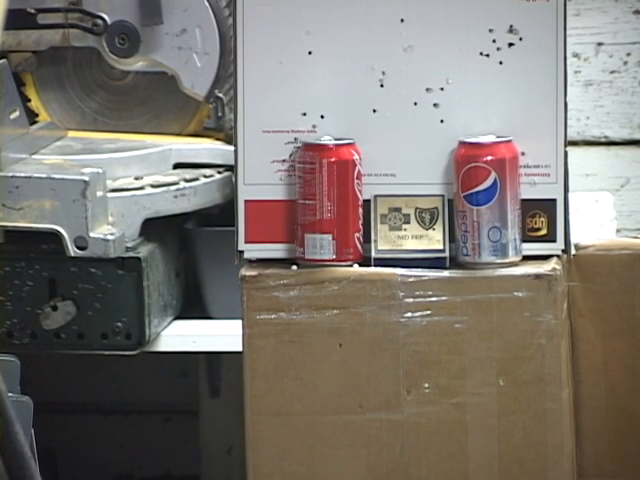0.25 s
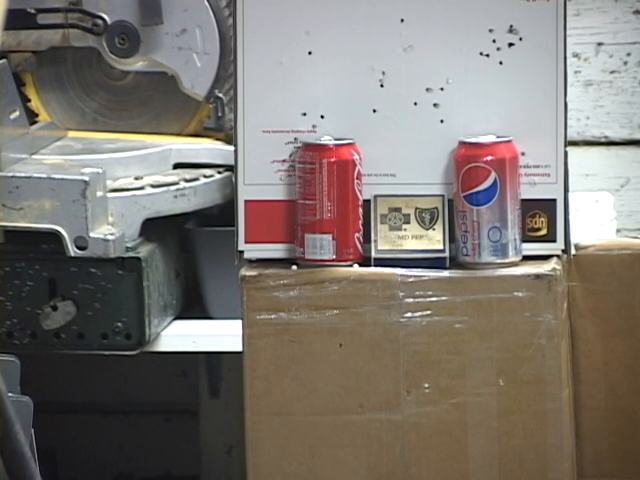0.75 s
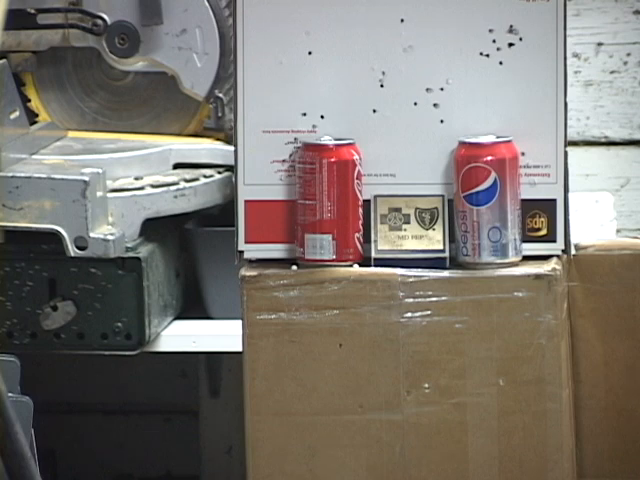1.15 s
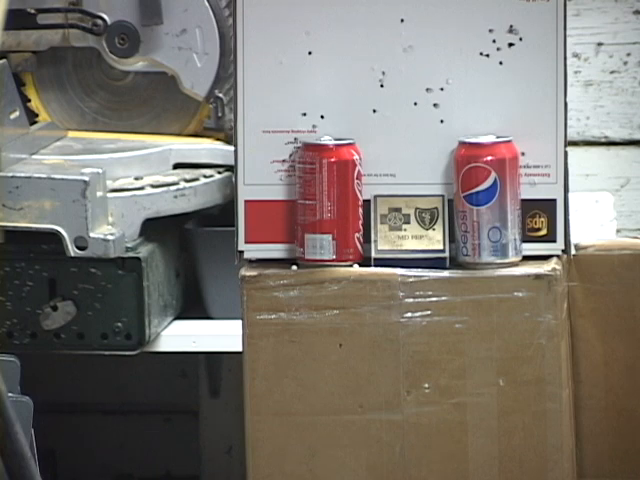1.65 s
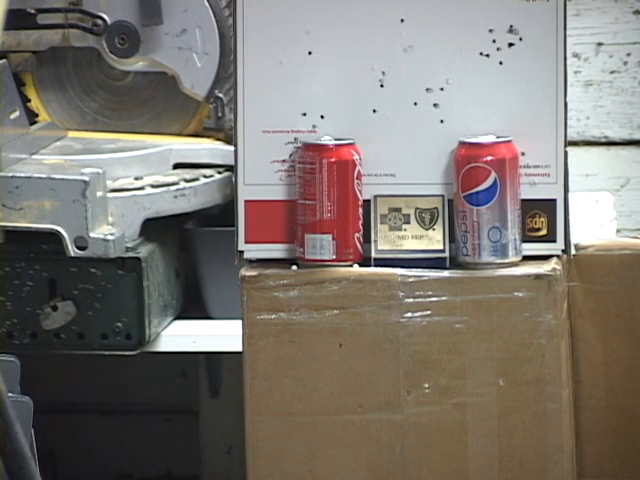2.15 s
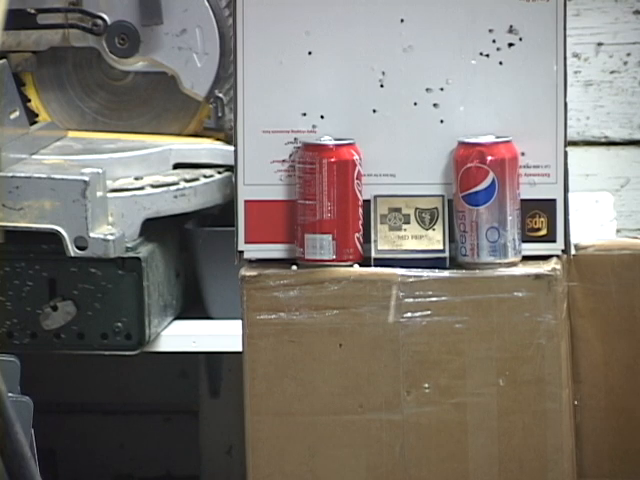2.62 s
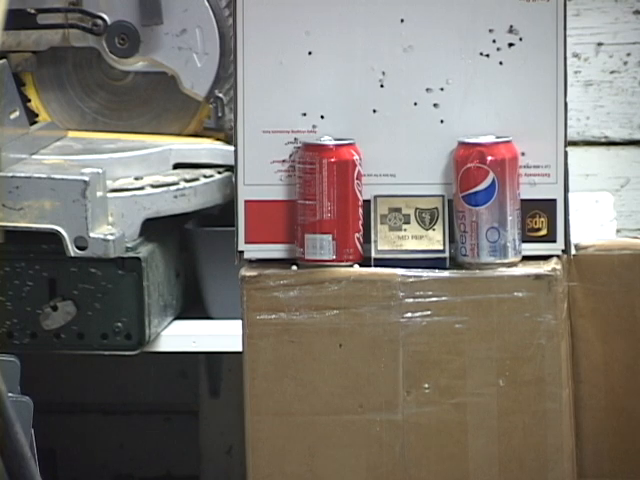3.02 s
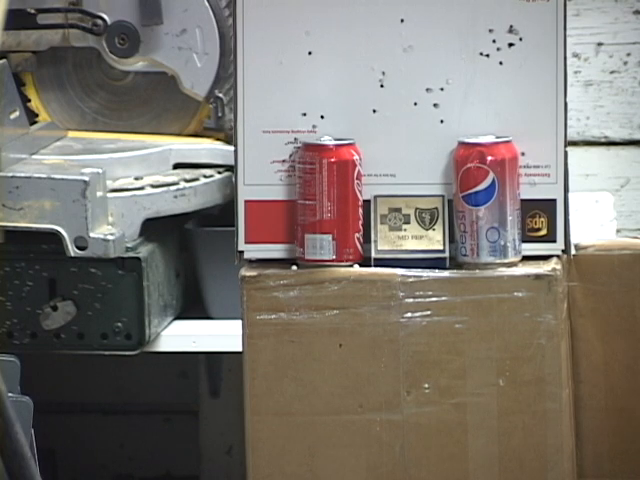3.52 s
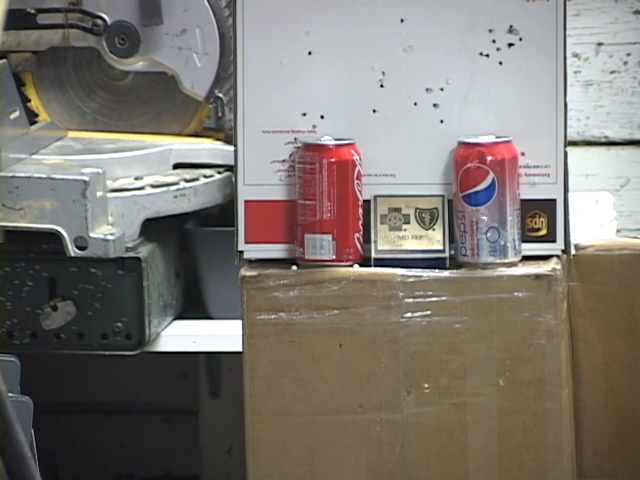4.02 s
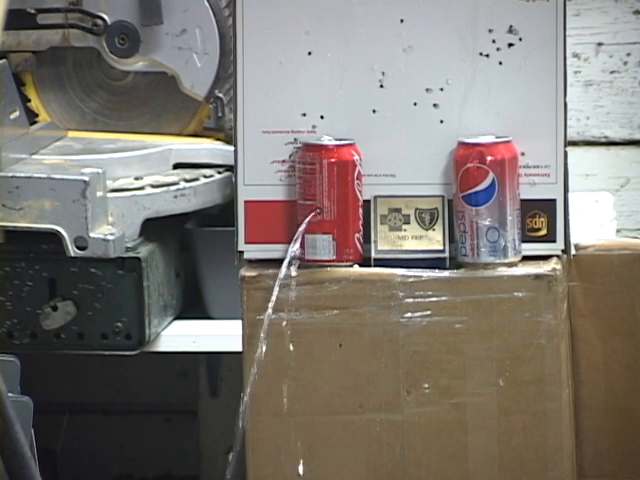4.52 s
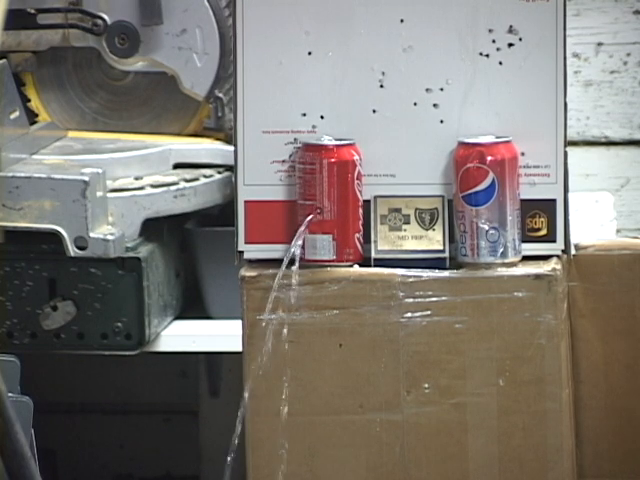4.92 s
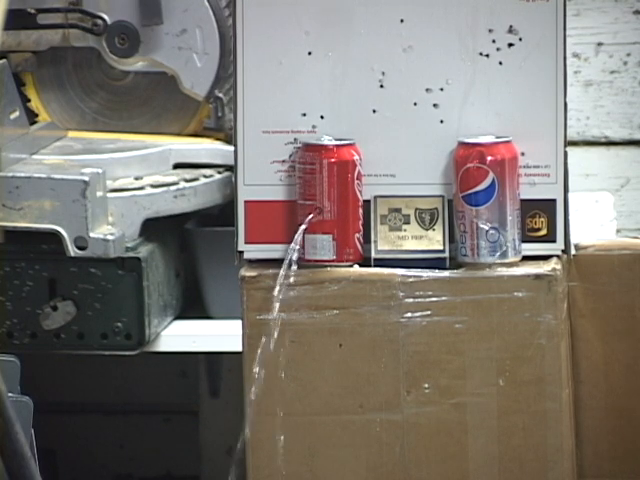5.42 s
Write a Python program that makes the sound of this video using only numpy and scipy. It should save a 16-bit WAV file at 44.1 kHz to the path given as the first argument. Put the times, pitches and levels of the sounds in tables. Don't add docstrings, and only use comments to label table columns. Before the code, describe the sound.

Quiet garage hiss, low rumble and a faint cricket, with slight cloth rustle and hand contacts. A spring air gun then slams very close, its pellet cracking onto the target, with a hollow barrel ring and metallic room echo. The plastic slide scrapes and clacks back and forth, a second shot pierces a can, liquid hisses and spatters, and pumping begins again. Stereo microphone, overloaded and flattened by automatic gain.

```python
import sys
import numpy as np
from scipy import signal
from scipy.fft import rfft, irfft
from scipy.io import wavfile
from scipy.ndimage import uniform_filter1d

SR = 44100
rng = np.random.default_rng(int(sys.argv[2]) if len(sys.argv) > 2 else 0)


def rack_gain(trim_db):
    fader = np.asarray(trim_db, float)
    return 10 ** (fader / 20)


def file_out(sig):
    cols = np.atleast_2d(sig).T
    lim = np.clip(cols, -1, 1)
    pcm = np.round(lim * 32767).astype(np.int16)
    wavfile.write(sys.argv[1], SR, pcm)


N = 249606
T = np.arange(N) / SR

# frequency [Hz], t60 [s].
GARAGE_T60 = [(100, 0.099), (300, 0.21), (700, 0.26), (1400, 0.26), (2500, 0.24), (6000, 0.23),
              (12000, 0.19)]
# frequency [Hz], likeness [0-1].
ECHO_ALIKE = [(60, .85), (400, .87), (800, .75), (1500, .45), (2500, .25), (4000, .08), (15000, .05)]


def unit(x):
    return x / np.sqrt(np.mean(x ** 2) + 1e-20)


def along(points, hz):
    f, v = np.transpose(points)
    return np.interp(np.log(hz + 1), np.log(f + 1), v)


def add(mix, start_s, sound):
    part = mix[:, round(start_s * SR):][:, :sound.shape[1]]
    part += sound[:, :part.shape[1]]


def diffuse(size, gain, alike):
    hz, t, z = signal.stft(rng.standard_normal((2, size)), SR, nperseg=256)
    turn = np.arccos(np.clip(along(alike, hz), -1, 1))[:, None] / 2
    mid, side = z[0] * np.cos(turn), z[1] * np.sin(turn)
    shaped = np.array([mid + side, mid - side]) * gain(hz[:, None], t)
    return signal.istft(shaped, SR, nperseg=256)[1][:, :size]


def causal(x, colour_db):
    cepstrum = irfft(np.log(rack_gain(colour_db(np.fft.rfftfreq(1024, 1 / SR))) + 1e-6))
    cepstrum[1:512] *= 2
    cepstrum[513:] = 0
    impulse = irfft(np.exp(rfft(cepstrum)))[None, :512]
    return signal.fftconvolve(x, impulse, axes=1)[:, :x.shape[1]]


def strike(colour_db, pan_db, echo_db, build_s, last_s=.5, stretch=1):
    crack_t60_s, right_lag_samples = .011, 6
    size = int(last_s * SR)
    t = np.arange(size) / SR
    crack = rng.standard_normal(size) + 0.79 * rng.standard_normal((2, size))
    crack *= rack_gain(-60 * t / crack_t60_s)
    reflections = uniform_filter1d(rng.standard_normal(size), size=25)
    grain = rack_gain(3.34 * np.exp(-t / 0.15) * 4.2 * reflections)
    tail = diffuse(size, lambda hz, u: rack_gain(-60 * u / along(GARAGE_T60, hz) / stretch), ECHO_ALIKE)
    tail = tail * grain * (1 - np.exp(-t / build_s))
    panned = crack * rack_gain([[pan_db / 2], [-pan_db / 2]])
    sound = causal(panned + rack_gain(echo_db - 19.0) * tail, colour_db)
    sound[1] = np.pad(sound[1], (right_lag_samples, 0))[:size]
    return sound / np.abs(sound[:, :SR // 50]).max()


def rings(modes, wander, rise_s, last_s=0.97):
    t = T[:int(last_s * SR)]
    ring = np.zeros((2, len(t)))
    for hz, db, t60_s in modes:
        level = rack_gain(db + rng.normal(0, 2) - 60 * t / t60_s)
        drift = wander * np.cumsum(rng.standard_normal(len(t))) + rng.normal(0, 0.4, (2, 1))
        ring += level * np.sin(2 * np.pi * hz * t + drift)
    return ring * (1 - np.exp(-t / rise_s)) * (1 - (t / last_s) ** 2)


def rafters():
    # frequency [Hz], level [dB], t60 [s].
    late = [(150, 0, 0.33), (500, -1.5, 1), (1300, -1.5, 0.86), (2600, -6, 0.85), (6000, -15, 0.32),
            (11970, -24.5, .4)]
    hz0, db, t60_s = np.transpose(late)
    fade = lambda hz, t: rack_gain(along(np.c_[hz0, db], hz) - 60 * t / along(np.c_[hz0, t60_s], hz))
    tail = diffuse(SR // 2, fade, ECHO_ALIKE) * (1 - np.exp(-T[:SR // 2] / 0.049))
    return tail / np.abs(tail).max()


def gun_colour(body_db, edge_db):
    # frequency [Hz], level [dB].
    plastic = [(100, -17.5), (400, -4), (1200, -1), (3000, -2.5), (5500, 0), (9000, -5.5), (12000, -17.5),
               (16000, -36.5)]
    tilt = [(1000, body_db + 9.5), (2000, 0), (8000, 0.0076), (12000, edge_db + 16.5)]
    return lambda hz: along(plastic, hz) + along(tilt, hz)


def air():
    # frequency [Hz], density [dB per Hz].
    air_spectrum = [(59, -20.5), (100, -5), (177, -8), (233, -11), (380, -11), (700, -20), (2420, -29),
                    (15500, -33)]
    # frequency [Hz], left-right likeness [0-1].
    air_alike = [(60, .9), (150, .7), (300, .3), (1400, .3), (3000, 0)]
    # time [s], level [dB].
    rumble_level = [(0.0, -51.5), (0.31, -54), (1.26, -53.5), (2.9, -51.5), (3.04, -50), (3.48, -60),
                    (3.61, -51.5), (5.56, -52), (5.66, -44)]
    # time [s], level [dB].
    rustle_level = [(0, -71), (.3, -60), (.45, -78), (.6, -64), (.7, -99)]
    machine = lambda hz: rack_gain(4.5 * np.exp(-((hz - 1300) / 220) ** 4))
    hiss = diffuse(N, lambda hz, t: rack_gain(along(air_spectrum, hz)) * machine(hz), air_alike)
    still = rack_gain(-56.5) * unit(hiss)
    low = signal.butter(2, [38, 95], "band", fs=SR, output="sos")
    rumble = unit(signal.sosfilt(low, rng.standard_normal(N) + 0.17 * rng.standard_normal((2, N))))
    cloth = unit(diffuse(SR, lambda hz, t: rack_gain(-5 * np.log2((hz + 1) / 2500) ** 2), ECHO_ALIKE))
    add(still, 0, rack_gain(np.interp(T[:SR], *np.transpose(rustle_level))) * cloth)
    return still + rack_gain(np.interp(T, *np.transpose(rumble_level))) * rumble


def hum():
    # frequency [Hz], level [dB].
    lines = [(60, -57.5), (120, -67.5), (180, -66.5)]
    mix = np.zeros(N)
    for hz, db in lines:
        strength_drift, phase_drift = (
            unit(uniform_filter1d(uniform_filter1d(rng.standard_normal(N), size=4000), size=4000))
            for _ in range(2))
        mix += rack_gain(db + 2.6 * strength_drift) * np.sin(2 * np.pi * hz * T + 0.83 * phase_drift)
    return mix * [[.8], [1.2]]


def cricket():
    # start [s], length [s], level [dB].
    chirps = [(.44, .04, -77), (0.876, 0.13, -77), (1.23, .15, -73), (1.65, 0.14, -72), (2.06, 0.11, -70.5),
              (2.926, 0.21, -68), (4.076, 0.071, -71.5), (4.5, 0.12, -72), (4.93, 0.055, -70)]
    mix = np.zeros(N)
    for start_s, length_s, db in chirps:
        stroke = 22 * (T - start_s) % 1
        jitter = 0.012 * np.cumsum(rng.standard_normal(N))
        cycles = 4250 * T + 220 * np.cumsum(stroke) / SR + jitter
        sounding = (T > start_s) * (T < start_s + length_s)
        mix += rack_gain(db + 6.5) * sounding * np.sin(np.pi * stroke) * np.sin(2 * np.pi * cycles)
    return mix * [[1], [.8]]


def jet():
    # time [s], level [dB].
    jet_level = [(4.3, -88), (4.45, -64.5), (4.7, -63), (5.0, -56), (5.3, -59), (5.66, -72.5)]
    spatter = rack_gain(16 * uniform_filter1d(rng.standard_normal(N), size=60))
    hiss = diffuse(N, lambda hz, t: rack_gain(-6 * np.log2((hz + 1) / 4500) ** 2), ECHO_ALIKE)
    return rack_gain(np.interp(T, *np.transpose(jet_level), left=-120)) * unit(spatter * hiss)


def ticks():
    # time [s], peak [dB], pitch [Hz], thud [dB].
    hands = [(0.0524, -44, 1900, -3), (0.126, -40, 560, 1), (0.3134, -47, 600, -8),
             (0.3814, -43.5, 3440, 0), (0.4094, -47, 500, -12), (1.0994, -53, 5010, -9)]
    handling = [(3.0808, -31.5, 2070, -11.5), (3.1091, -33.5, 1400, 1.5), (3.3195, -21.5, 1880, -16),
                (4.0896, -35, 1940, -16.5), (5.2174, -45, 1300, -12), (5.5295, -25, 2200, -9.5)]
    bounces = [(2.6423, -44.5, 4530, -13), (2.7002, -49, 5750, -15.5), (4.4681, -43, 4530, -3.5)]
    landings = [(0.5888, -53.5, 2090, -9), (1.585, -53, 1900, -9), (2.8605, -35, 2680, 5),
                (3.6015, -28.5, 3200, -20.5), (3.8735, -39, 1950, -14.5), (3.93, -46.5, 2300, -13.5),
                (3.975, -47.5, 1570, -13.5), (4.45, -41.5, 540, -20), (4.5784, -47.5, 1840, -8.5),
                (4.7037, -46.5, 3170, -8), (5.0875, -29.5, 3160, -29.5), (5.1924, -37, 5400, -14)]
    splashes = [(2.9572, -41.5, 4930, -17), (3.6937, -29, 5370, -18.5), (4.7695, -31.5, 5260, -19.5),
                (4.8728, -42.5, 5670, -9), (4.9765, -30.5, 5440, -32), (4.993, -30, 5580, -28)]
    # contacts, pitch width [octaves], broad [dB], edge at 3 kHz [dB], echo [dB].
    places = [(hands, 0.97, -38, -22, 1), (handling, 1.2, -37.5, -31, 8.2), (bounces, 0.87, -39.5, -14, 11),
              (landings, .55, -25.5, -30, 16), (splashes, 0.62, -17.5, -17, 18)]
    edge_db_per_octave = 12
    hump = lambda hz, centre_hz, octaves: rack_gain(-24 * (np.log2((hz + 1) / centre_hz) / octaves) ** 2)
    mix = np.zeros((2, N))
    for rows, octaves, broad_db, edge3k_db, echo_db in places:
        for start_s, db, pitch_hz, thud_db in rows:
            edge_db = edge3k_db + edge_db_per_octave * np.log2(pitch_hz / 3000)

            def colour(hz):
                pitch = hump(hz, pitch_hz, octaves)
                thud = rack_gain(2 * thud_db + 17.5) * hump(hz, 650, 1.25)
                edge = rack_gain(2 * edge_db + 1.0) * hump(hz, 8900, 0.35)
                broad = rack_gain(broad_db) * hump(hz, 3500, 1.6)
                return 10 * np.log10(pitch + thud + edge + broad)

            level_db = db + 6.0 + 0.19 * max(thud_db + 9, 0)
            add(mix, start_s, rack_gain(level_db) * strike(colour, 2.0, echo_db, build_s=0.0023, last_s=.3))
    return mix


def small_tones():
    # start [s], frequency [Hz], level [dB], t60 [s].
    spring = [(3.52, 6720, -55, 1.4), (3.52, 8600, -58, .3), (3.61, 5050, -52, .12), (5.44, 6750, -55, .5),
              (.535, 5720, -63, .15), (3.55, 1340, -56, 1.4)]
    # start [s], frequency [Hz], level [dB], length [s].
    creak = [(4.71, 1595, -51.5, 0.031), (4.72, 852, -49, 0.056), (4.726, 3200, -55.5, 0.039)]
    # time [s], level [dB].
    jolts = [
        (2.293, -4),
        (3.148, -18),
        (3.212, -18.5),
        (3.418, -16.5),
        (4.161, -7),
        (5.288, -25),
        (5.368, -20),
        (5.641, -42),
    ]
    mix, t = np.zeros((2, N)), T[:SR // 2]
    for start_s, hz, db, t60_s in spring:
        add(mix, start_s, rings([(hz, db, t60_s)], wander=.008, rise_s=0.0099))
    for start_s, hz, db, length_s in creak:
        swell = np.sin(np.pi * np.clip(t / length_s, 0, 1))
        drift = 0.032 * np.cumsum(rng.standard_normal(len(t)))
        add(mix, start_s, rack_gain(db) * swell * np.sin(2 * np.pi * hz * t + drift) * np.ones((2, 1)))
    for start_s, db in jolts:
        onset = np.sin(np.clip(t / 0.00038, 0, np.pi / 2))
        swing = (1 - t / 0.02) * np.exp(-t / 0.023)
        add(mix, start_s, rack_gain(db) * swing * onset * [[1.3], [.6]])
    return mix


def slide():
    # start [s], length [s], last level [dB], growth [dB], body [dB].
    strokes = [
        (3.113, .028, -33.5, 22, -0.5),
        (3.161, .044, -21.5, 15.5, -4.5),
        (3.324, .077, -24.5, 22, -2),
        (5.243, .044, -27, 42.5, -6),
        (5.299, .065, -24, 12, -2.5),
        (5.539, .093, -27.5, 19, -1.5),
    ]
    # frequency [Hz], width [Hz], gain [dB].
    forend = [(520, 110, 11.5), (795, 80, 5.5), (1300, 90, 6), (1600, 82, 5), (2700, 150, 7.5)]
    growth_bend, jerk_db, jerk_t60_s = 1.4, -7.5, 0.028

    def grip_colour(hz):
        peaks = sum(db * np.exp(-((hz - centre) / width) ** 2) for centre, width, db in forend)
        return -14 * np.log2((hz + 1) / 1150) ** 2 + peaks

    mix = np.zeros((2, N))
    for start_s, length_s, db, growth_db, body_db in strokes:
        t = T[:int(length_s * SR)]
        roughness = uniform_filter1d(rng.standard_normal(len(t)), size=30)
        grit = rng.standard_normal((2, len(t))) * rack_gain(2.4 * roughness * 3.6)
        bright = unit(causal(grit, gun_colour(-55.5, -13)))
        dull = unit(causal(grit, grip_colour))
        growth = rack_gain(-growth_db * (1 - t / length_s) ** growth_bend)
        jerk = rack_gain(jerk_db - growth_db / 2 - 60 * t / jerk_t60_s)
        scrape = rack_gain(db) * (growth + jerk) * (1 - np.exp(-t / .004)) * (bright + rack_gain(body_db) * dull)
        tail = diffuse(SR // 2, lambda hz, u: rack_gain(-60 * u / along(GARAGE_T60, hz)), ECHO_ALIKE)
        add(mix, start_s, 1.02 * scrape)
        echo = signal.fftconvolve(scrape, tail / np.linalg.norm(tail[0]), axes=1)
        add(mix, start_s, rack_gain(-5) * echo)
    return mix


def knocks():
    # time [s], peak [dB], body [dB], left-right [dB].
    sear = [(2.261, -24, -20.5, 8.5), (3.1345, -33, -18.5, 18), (3.3478, -23.5, -8, -2)]
    piston = [(2.293, -5, -26.5, 8.5), (2.2994, 12, -13.5, -16.5), (4.1594, -16.5, 4.5, 11),
              (4.1653, 4.5, -21.5, 0)]
    pellets = [(2.3658, 15.5, -17.5, 4.5), (4.192, 6.5, -33.5, -5.5), (4.244, -7, -3.5, 1.5)]
    latch = [(3.1423, -17, -17, 8), (3.1504, -8, -8, 7), (5.2867, -10.5, -21.5, 10)]
    back_stop = [(3.1935, -14, -8.5, 6), (3.2057, -2, -15.5, -2.5), (3.2263, -11.5, -18, -4.5),
                 (5.3693, -9.5, -15.5, -1.5), (5.3771, -21, -21, 0.5)]
    front_stop = [(3.4034, -18, -8.5, 18), (3.4124, -6, -15.5, 11), (3.4195, -4, -13, 1.5),
                  (3.4257, -5, -13, 4.1), (5.6368, -12.5, -11, 6.3), (5.6433, -0.5, -17.5, 2.1),
                  (5.643, -4, -2, 19)]
    # knocks, edge [dB], echo [dB].
    kinds = [(sear, -20, 9.8), (piston, -22.5, 2.6), (pellets, -17.5, 3),
             (latch, -7.5, 9), (back_stop, -9.5, 4.3), (front_stop, -14, 12)]
    # frequency [Hz], level [dB], t60 [s].
    shell = [(782, -7, 0.04), (1290, -9, 0.054), (1628, -7.5, 0.051), (2678, -4.5, 0.068), (4830, -5, 0.1),
             (5450, -5.5, 0.12), (6020, -3.5, .05), (7170, -0.5, 0.072), (8700, 1.5, 0.043),
             (9860, 3.5, 0.028)]
    mix = np.zeros((2, N))
    for rows, edge_db, echo_db in kinds:
        for start_s, db, body_db, pan_db in rows:
            colour = gun_colour(body_db, edge_db)
            knock = strike(colour, pan_db, echo_db, build_s=0.0011, last_s=.4)
            add(mix, start_s, rack_gain(db + 12.0) * knock)
            add(mix, start_s, rack_gain(db - 10.0) * rings(shell, wander=0.086, rise_s=.001, last_s=.06))
    return mix


def barrel():
    # time [s], peak [dB], barrel ring [dB].
    slams = [
        (2.2926, 22.5, -7),
        (4.1597, 20, -7),
    ]
    # frequency [Hz], level [dB], t60 [s].
    pipe = [(804.4, -3.5, 0.13), (789, -7.5, .1), (850, -2.5, 0.062), (2326, -6.5, 0.13), (632, -9, 0.1),
            (2220, -8, 0.065), (567, -9, 0.079), (674, -12, 0.18), (195, -22.5, 0.2), (493.7, -13.5, 0.13),
            (5540, -17.5, 0.13)]
    # time [s], level [dB], length [0-1].
    returns = [(2.345, 10.5, 0.8), (4.226, 10, 0.91), (3.43, 3.5, 0.5), (3.21, -10, .8), (5.38, -6, 0.82),
               (5.292, -12.5, .6)]
    # frequency [Hz], level [dB], t60 [s].
    tools = [(344, -11, 0.42), (393, -21.5, .5), (509, -6.5, 1.0), (597, -8.5, 0.93), (680, -9.5, .5),
             (740, -20, 0.87), (804, -1, 0.69), (970, -4.5, 0.64), (1225, -3, 0.65), (1290, -5, 0.78),
             (1430, -10, .4)]
    # time [s], ring [dB], late echo [dB].
    shakes = [(2.33, -30, -26), (2.86, -53, -58), (3.452, -53, -44), (3.874, -64, -63), (4.202, -34, -29.5),
              (5.389, -56, -53)]
    mix = np.zeros((2, N))
    for start_s, db, ring_db in slams:
        add(mix, start_s + .002, rack_gain(db + ring_db) * rings(pipe, wander=.02, rise_s=0.011, last_s=.4))
        add(mix, start_s, rack_gain(db) * strike(gun_colour(-11.5, -12.0), 0, echo_db=16, build_s=0.011))
    for start_s, db, length in returns:
        swell = strike(gun_colour(-14.5, -12.0), 0, echo_db=37.5, build_s=0.011, stretch=length)
        add(mix, start_s, rack_gain(db) * swell)
    for start_s, db, late_db in shakes:
        add(mix, start_s, rack_gain(db) * rings(tools, wander=.016, rise_s=.03))
        add(mix, start_s, rack_gain(late_db) * rafters())
    return mix


def scene():
    background = air() + hum() + cricket() + jet()
    return background + ticks() + small_tones() + slide() + knocks() + barrel()


def band_limit(x):
    return signal.sosfilt(signal.butter(12, 15620, fs=SR, output="sos"), x)


def record(dry):
    # frequency [Hz], left-right [dB].
    capsules = [(60, -3), (180, 0), (550, 1), (1650, 1.5), (4970, -1), (15000, 2.5)]
    follow_s, threshold_db, knee, squeeze = .004, -13, 2, .2
    left = causal(dry[[0]], lambda hz: along(capsules, hz) / 2)
    right = causal(dry[[1]], lambda hz: -along(capsules, hz) / 2)
    heard = np.vstack([left, right])
    keep = np.exp(-1 / (follow_s * SR))
    power = signal.lfilter([1 - keep], [1, -keep], np.mean(heard ** 2, 0))
    gain = (1 + (power / rack_gain(2 * threshold_db)) ** knee) ** -squeeze
    slow = signal.butter(2, [12, 45], "band", fs=SR, output="sos")
    wobble = signal.sosfilt(slow, np.sqrt(power) * gain * [[1.3], [.5]])
    held = heard * gain + rack_gain(-31.0) * wobble
    clipped = held / (1 + np.abs(held) ** 8) ** (1 / 8)
    return band_limit(clipped)


dry = scene()
out = record(dry)
file_out(out)
```